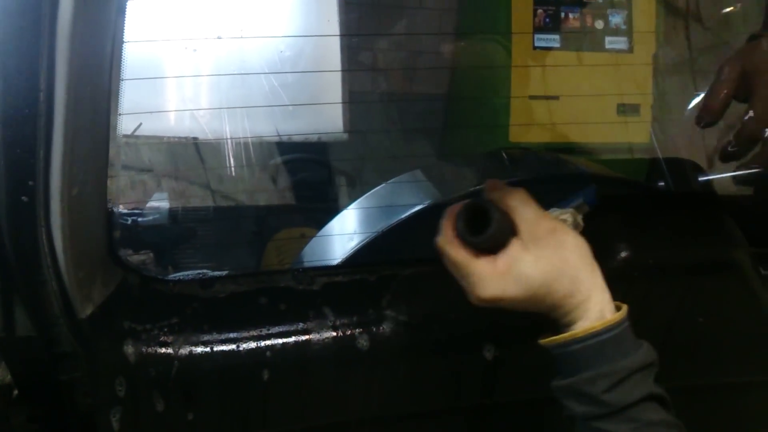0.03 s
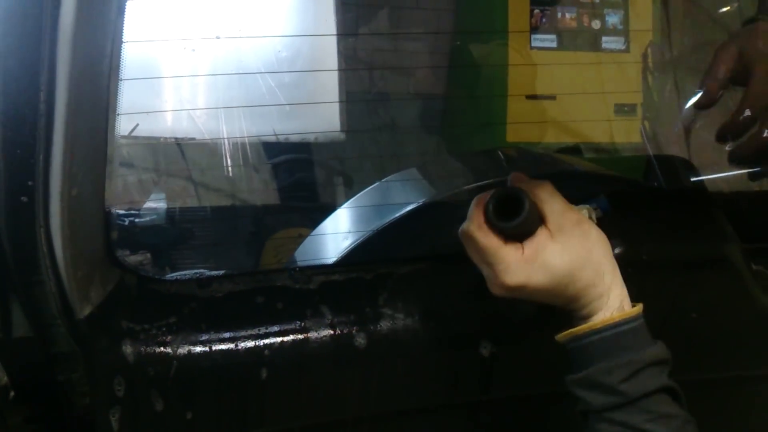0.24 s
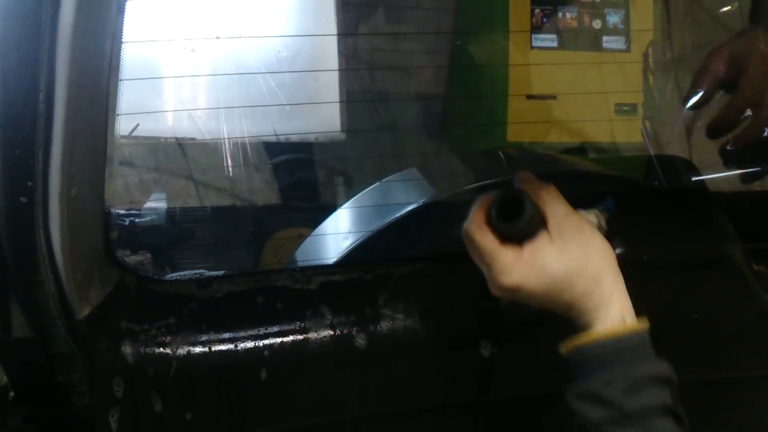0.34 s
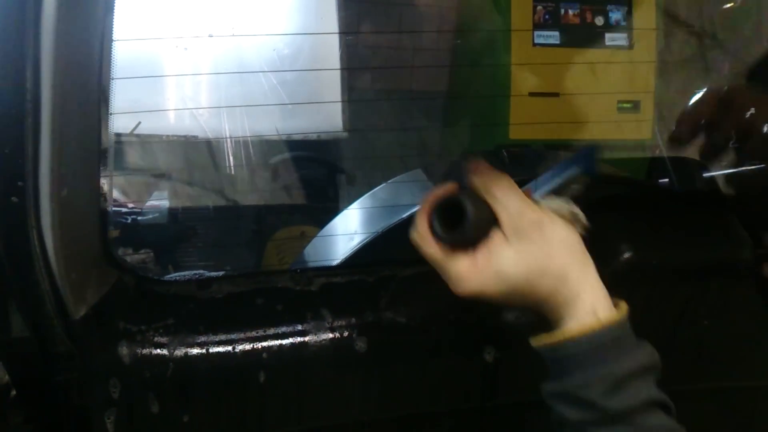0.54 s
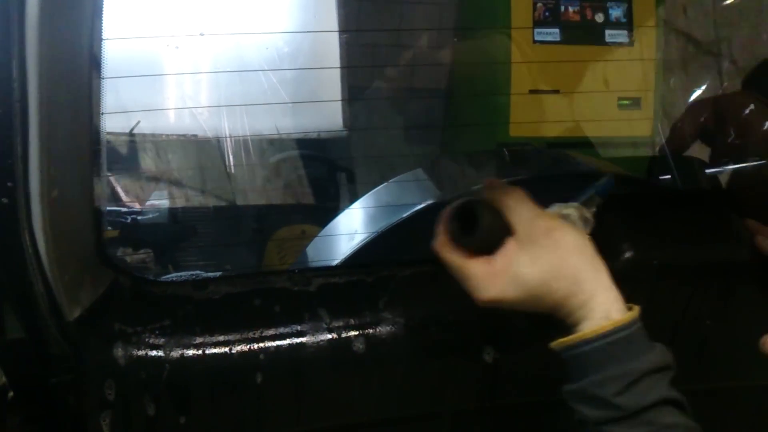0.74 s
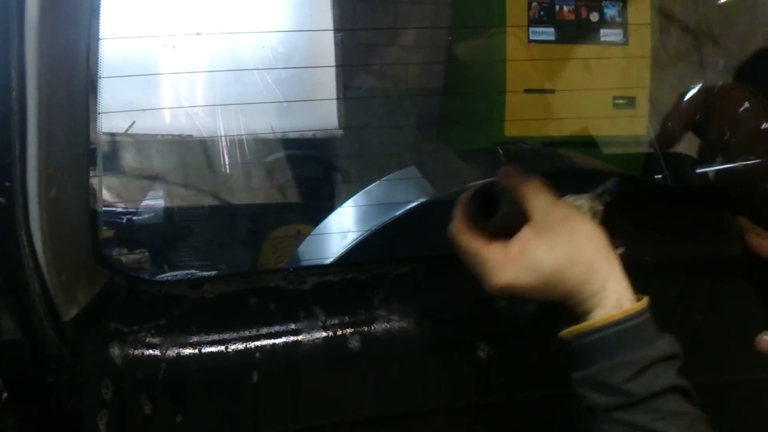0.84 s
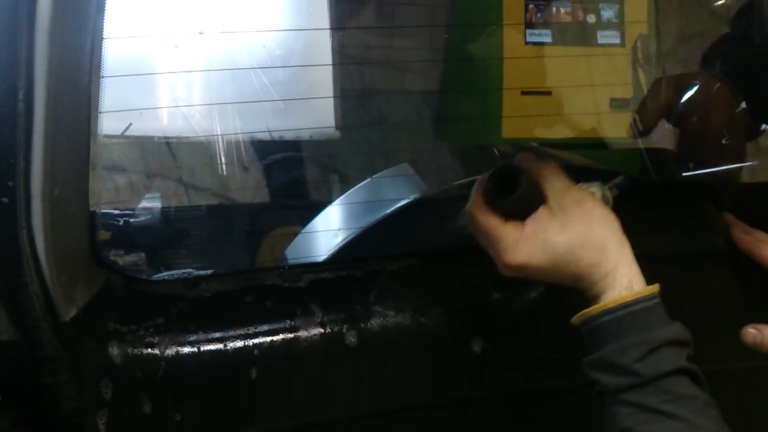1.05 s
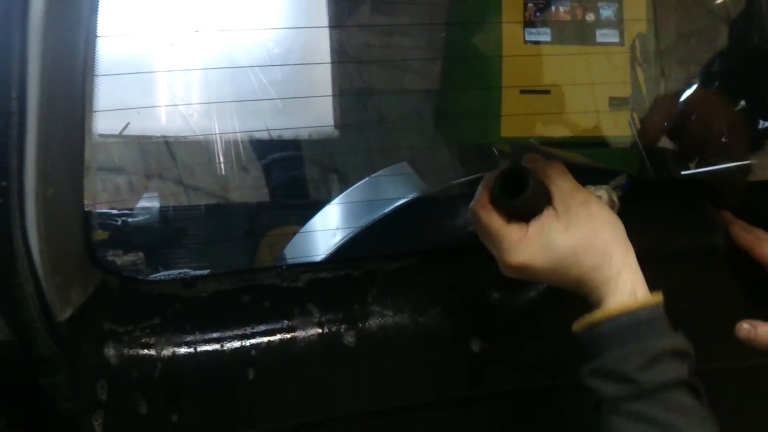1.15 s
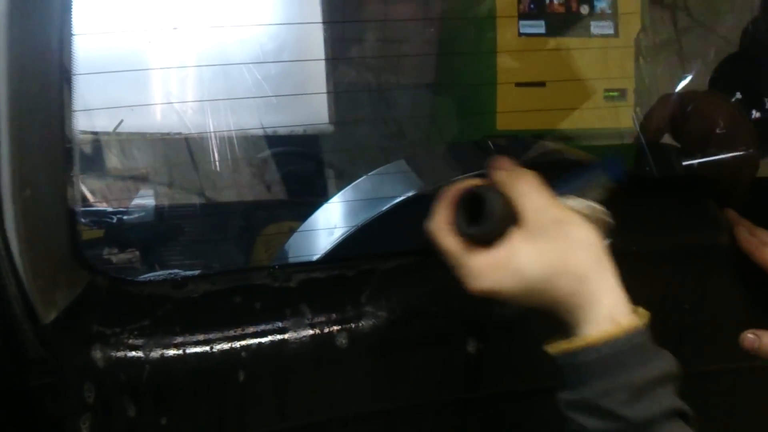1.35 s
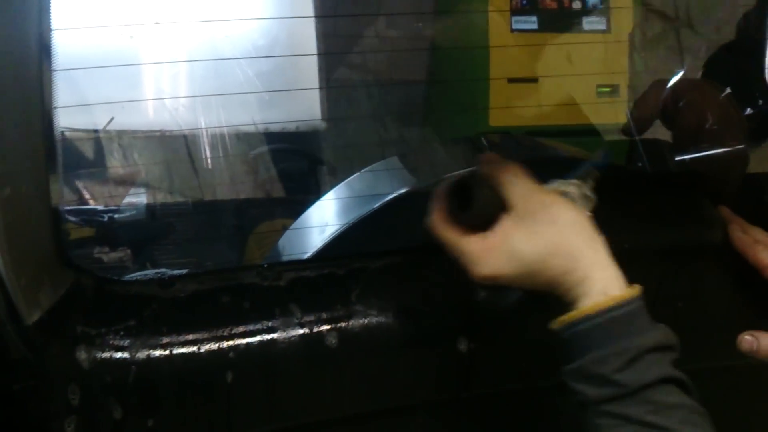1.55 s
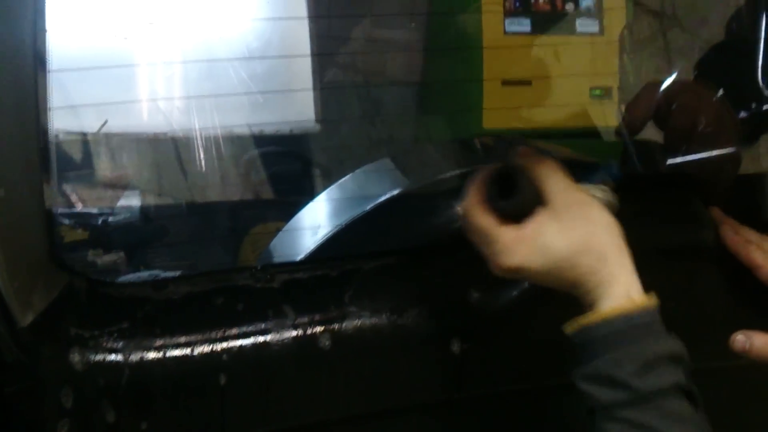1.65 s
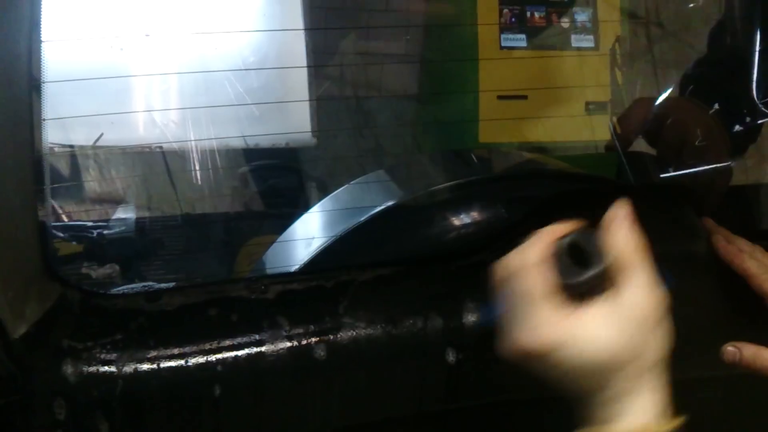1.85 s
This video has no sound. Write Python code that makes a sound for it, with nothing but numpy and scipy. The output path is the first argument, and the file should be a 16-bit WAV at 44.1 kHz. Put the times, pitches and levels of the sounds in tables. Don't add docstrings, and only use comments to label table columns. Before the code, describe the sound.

A hard tool edge scrapes film on a car's rear window, very close. Soft knocks come first, then a sharp crack and low buzzing shudder at 0.4 s and a clear knock at 0.65. A low jolt near 0.97 leads to a second shudder around 1.14, crowded ticks and a tiny squeal at 1.2. Sparser knocks follow from 1.58 to 1.8, over faint rubbing, handling rumble and quiet workshop hum.

```python
import sys
import numpy as np
from scipy import signal
from scipy.fft import rfft, irfft
from scipy.io import wavfile
from scipy.ndimage import uniform_filter1d

SR = 44100
rng = np.random.default_rng(int(sys.argv[2]) if len(sys.argv) > 2 else 0)


def to_wav(s):
    ch = np.atleast_2d(s).T
    pcm = np.round(np.clip(ch, -1, 1) * 32767)
    wavfile.write(sys.argv[1], SR, pcm.astype(np.int16))


def gain_from_db(level_db):
    decades = np.asarray(level_db, float) / 20
    return 10 ** decades


N = 83790

# hz, level_db
SHOP_SPECTRUM = [(20, 5), (330, -22.5), (910, -6.5), (1500, -15.5), (6000, -26), (7900, -21), (9500, -30.5),
                 (15000, -43.5)]
# hz, level_db
RUMBLE_SPECTRUM = [(15, -1), (30, -2), (65, -4.5), (100, -15), (145, -8), (200, -10), (400, -17),
                   (700, -49.5)]
# time_s, level_db
HAND_MOTION = [(0.0, -67.5), (0.328, -65.5), (0.418, -65.5), (1.184, -60.5), (1.312, -69), (1.56, -90.5),
               (1.73, -62), (1.9, -66.5)]
# start_s, level_db, pitch_hz
MOUNT_JOLTS = [
    (0.966, -44.5, 70),
    (1.283, -59, 53),
    (1.596, -46.5, 68),
]
# start_s, length_s, grit_db, scratch_db, hiss_db
STROKES = [(-.06, 0.083, -73, -72, -68.5), (0.003, 0.16, -74, -72.5, -59.5),
           (0.394, 0.016, -47, -51, -61.5), (0.402, 0.11, -68.5, -72.5, -74), (0.455, 0.037, -71, -89, -75),
           (0.605, 0.21, -72, -78.5, -76), (0.811, 0.013, -71, -66, -89), (0.836, 0.21, -75.5, -75, -76.5),
           (1.042, 0.091, -64, -59, -65.5), (1.081, 0.097, -70, -85, -62.5),
           (1.167, 0.064, -58, -58.5, -66.5), (1.232, 0.06, -60.5, -66, -69),
           (1.624, 0.025, -63.5, -61.5, -75.5), (1.653, 0.16, -77.5, -69, -76.5),
           (1.772, 0.0067, -50.5, -59.5, -64.5), (1.794, 0.085, -61, -66, -72)]
# hz, level_db
HISS_SPECTRUM = [(1500, -27.5), (5100, -13.5), (6800, -10), (7900, -2), (9300, -14.5), (13500, -30),
                 (15500, -32)]
# hz, level_db
GRIT_SPECTRUM = [(90, -47), (160, 3), (300, 0.5), (520, -2.5), (830, -5), (1030, -5.5), (1350, -19),
                 (2600, -37)]
# hz, level_db
SCRATCH_SPECTRUM = [(900, -49), (1400, -4.5), (2120, -5.5), (2600, -8), (3300, -8), (4400, -19),
                    (6500, -24.5), (9000, -50)]
# start_s, level_db, pitch_hz, t60_s
TICKS = [(0.244, -50, 745, 0.036), (0.4005, -41, 836, 0.043), (0.405, -43.5, 2070, 0.023),
         (0.412, -43.5, 806, 0.037), (0.4122, -36.5, 261, 0.046), (0.433, -49.5, 894, 0.074),
         (0.416, -46, 1684, 0.035), (0.6538, -39, 996, 0.035), (0.656, -42, 646, 0.035),
         (0.655, -48, 2150, 0.024), (0.669, -62, 1060, 0.045), (1.048, -63.5, 830, 0.024),
         (1.112, -50, 993, 0.038), (1.122, -53, 880, .03), (1.152, -48, 856, 0.031),
         (1.191, -47.5, 946, 0.027), (1.2055, -39.5, 845, 0.022), (1.215, -51, 702, 0.048),
         (1.224, -47.5, 615, 0.035), (1.228, -52, 1030, 0.018), (1.243, -51, 800, 0.049),
         (1.2705, -43.5, 830, 0.023), (1.278, -55.5, 890, .02), (1.287, -49, 840, 0.057),
         (1.296, -52, 804, 0.035), (1.5765, -50, 806, 0.033), (1.597, -45.5, 490, 0.019),
         (1.639, -59, 2900, 0.019), (1.711, -64, 840, 0.026), (1.772, -41.5, 1254, 0.023),
         (1.777, -44, 334, 0.046), (1.806, -55, 416, 0.02), (1.869, -56.5, 2190, 0.039),
         (0.09, -55.5, 139, 0.19), (0.46, -52, 298, .08), (0.495, -51.5, 281, 0.13),
         (0.5, -58.5, 457, 0.14), (1.195, -56.5, 3480, 0.082), (1.21, -61, 3700, 0.042),
         (1.338, -58, 140, 0.095), (1.5265, -65.5, 700, 0.018), (1.693, -51, 336, 0.017)]
# start_s, length_s, pitch_hz, level_db
SQUEAL = (1.2, 0.05, 2109.5, -59)
# time_s, rate_hz, level_db
SHUDDERS = [
    [(0.38, 240.7, -54), (0.389, 240.6, -43.5), (0.401, 238.4, -29), (0.407, 235, -33.5), (0.412, 219, -47),
     (0.431, 198.4, -71), (0.441, 216, -41.5), (0.455, 205, -51.5), (0.475, 219, -70)],
    [(1.068, 214, -56), (1.09, 224, -49.5), (1.104, 230.5, -38), (1.123, 218, -47), (1.136, 193.5, -29),
     (1.15, 209, -38.5), (1.166, 222, -41), (1.178, 237, -49.5), (1.19, 236, -69)],
]
# start_s, crack_db, spot_hz,
# thump_re_crack_db, left_re_right_db
KNOCKS = [(0.004, -56.5, 126, 4.5, -4.5), (0.085, -66.5, 136, -0.5, -15),
          (0.244, -46, 160.7, 7, -2.5), (0.269, -51, 223.5, 1.5, -4.5), (0.399, -35, 243, -17, -9.5),
          (0.402, -49.5, 277, -14, -9), (0.4069, -40, 188.6, 8.5, -4), (0.44, -58, 210, 10, 2),
          (0.612, -50, 147, 1, -2.5), (0.654, -36, 153.5, -1, -2), (0.687, -55.5, 130.5, 7.5, -4),
          (0.818, -58, 145, 9.5, -4), (0.908, -54.5, 316, -15.5, -11),
          (0.96, -51.5, 163.7, 14.5, 6.5),
          (0.975, -67, 134, 21, 3), (1.129, -63.5, 182, 8.5, -9), (1.151, -46, 203, -33, -3),
               (1.191, -46.5, 188, 1, -1), (1.205, -43, 156.3, -0.5, -3), (1.272, -49, 311, -14, -11),
               (1.527, -61.5, 148.5, 6.5, -3.5), (1.576, -48.5, 162, 3, -2), (1.595, -59.5, 144, 5.5, 22.5),
               (1.63, -45, 155, 5, -4), (1.665, -59, 136, 11, 0), (1.693, -71, 177, 15.5, 27.5),
               (1.729, -57, 162, -1, -6), (1.771, -42, 313, -12.5, -9), (1.805, -54, 333, -2, -5)]
# hz, level_db, t60_s
PANE_MODES = [(143, -12, .1), (215, -18, .07), (275, -16, .07), (360, -20, .06), (460, -26, .11)]
# hz, level_db, t60_s
EDGE_MODES = [(660, -5, .035), (835, -1, .05), (1000, 0, .05), (1200, -3, .025), (1450, -4, .02),
              (1700, -4, .025), (2110, -7, .03), (2800, -17, .02), (3400, -19, .02)]
# hz, gain_db
LEFT_PORT_GAIN = [(100, -6), (500, 1.5), (1000, 5.5), (2000, -25.5), (4000, -37), (8000, -77), (12000, 0),
                  (15000, 11)]

SHOP_DB = -70.5
GRIT_PER_S, GRIT_SPREAD_DB = 2200, 2
RISE_SHARE, RELEASE_SHARE = 0.6, 0.2
TICK_BITE_S, TICK_PAN_DB, TICK_PARTNER_RATIO, TICK_PARTNER_DB = 0.0003, -3.5, 1.404, -8.5
SHUDDER_JITTER, SHUDDER_PAN_DB, SHUDDER_OCTAVE_DB = 0.0514, -4.5, -57
SPOT_T60_S, PARTNER_RATIO, PARTNER_DB, PARTNER_T60_S = 0.089, 1.703, -5, 0.052
SWELL_S, BITE_S, SPILL_HZ = 0.0022, 0.0007, 120.3
THUMP_DB, CRACK_DB = 7.5, -10.5
SNAP_DB, SNAP_T60_S, RATTLE_DB, RATTLE_T60_S = 7, 0.022, -10, 0.15
TOP_HZ, LOUD_DB, DULL_SHARE = 3050, -35.5, 0.13
HIT_SCATTER_DB = 2
ROOM_DB, ROOM_T60_S, LEFT_LAG_SAMPLES = -19, 0.25, 8


def curve(rows, col=1):
    r = np.array(rows)
    return np.interp(np.arange(N) / SR, r[:, 0], r[:, col])


def colour(x, points):
    p = np.array(points)
    hz = np.arange(N // 2 + 1) * SR / N + 1
    gain_db = np.interp(np.log(hz), np.log(p[:, 0]), p[:, 1])
    return irfft(rfft(x) * gain_from_db(gain_db), N)


def unit(x):
    return x / np.sqrt(np.mean(x ** 2))


def walk(rate_hz):
    hold = int(SR / rate_hz)
    steps = np.repeat(rng.standard_normal(N // hold + 1), hold)
    return 1.45 * uniform_filter1d(uniform_filter1d(steps, hold), hold)[:N]


def fade(t, t60_s):
    return np.exp(-np.log(1000) * t / t60_s)


def onset(t, rise_s):
    return 1 - np.exp(-t / rise_s)


def ring(t, modes, scatter):
    out = 0
    for (hz, db, t60_s), s in zip(modes, scatter):
        tone = np.sin(2 * np.pi * hz * (1 + 0.018 * s) * t)
        out = out + gain_from_db(db + HIT_SCATTER_DB * s) * tone * fade(t, t60_s)
    return out


def bandpass(x, lo_hz, hi_hz, order=2):
    return signal.sosfilt(signal.butter(order, [lo_hz, hi_hz], "band", fs=SR, output="sos"), x)


def pan(db):
    return gain_from_db(np.array([[db / 2], [-db / 2]]))


def workshop():
    mid, side = (unit(colour(rng.standard_normal(N), SHOP_SPECTRUM)) for _ in range(2))
    side = colour(side, [(30, -0.5), (300, 1.5), (1500, -1.0), (15000, 3.5)])
    left = colour(mid + side, [(30, 5), (1000, -1.5), (4000, -1.5), (8000, -11), (11000, 0.0)])
    return gain_from_db(SHOP_DB - 2.0) * np.array([left, mid - side])


def handling():
    mid, side = (unit(colour(rng.standard_normal(N), RUMBLE_SPECTRUM)) * gain_from_db(1.1 * walk(3.3))
                 for _ in range(2))
    rumble = gain_from_db(curve(HAND_MOTION) + 3.0) * (mid + 0.33 * side * np.array([[1], [-1]]))
    jolts = 0
    for start_s, db, hz in MOUNT_JOLTS:
        after = np.clip(np.arange(N) / SR - start_s, 0, None)
        jolts = jolts + ring(after, [(hz, db, 0.12)], [0]) * onset(after, 0.0014)
    return rumble * pan(-4.5) + jolts * pan(7.8)


def pressure(col):
    t, power = np.arange(N) / SR, 1e-12
    for row in STROKES:
        u = (t - row[0]) / row[1]
        rise = np.sin(np.pi / 2 * np.clip(u / RISE_SHARE, 0, 1)) ** 2
        release = np.exp(-np.clip(u - 1, 0, None) / RELEASE_SHARE)
        power = power + (rise * release * gain_from_db(row[col])) ** 2
    return np.sqrt(power)


def slide():
    noise = np.array([unit(colour(rng.standard_normal(N), HISS_SPECTRUM)) for _ in range(2)])
    port_gain = gain_from_db(np.array([[-7], [0]]))
    return noise * port_gain * pressure(col=4) * gain_from_db(1.5 * walk(45.03))


def grains(points, ring_share, patchy_db):
    size = gain_from_db(GRIT_SPREAD_DB * np.minimum(rng.exponential(size=(2, N)), 3))
    clicks = (rng.random((2, N)) < GRIT_PER_S / SR) * rng.standard_normal((2, N)) * size
    clicks = np.array([clicks[0], clicks[0] + 0.64 * clicks[1]])
    rung = 0
    for hz, _, t60_s in EDGE_MODES:
        r = fade(1 / SR, t60_s)
        poles = [1, -2 * r * np.cos(2 * np.pi * hz / SR), r * r]
        flare = gain_from_db(patchy_db * np.clip(walk(21.7), -2, 1.5))
        rung = rung + flare * unit(signal.lfilter([1, 0, -1], poles, clicks))
    return np.array([unit(colour(c, points)) + ring_share * unit(colour(g, points))
                     for c, g in zip(clicks, rung)])


def scrape():
    drumming = pressure(col=2) * gain_from_db(3.57 * walk(39.98)) * grains(GRIT_SPECTRUM, 0.21, 3.2)
    scratching = pressure(col=3) * grains(SCRATCH_SPECTRUM, 0.32, 11.0)
    return drumming * pan(-5) + scratching


def ticks():
    out = 0
    for start_s, db, hz, t60_s in TICKS:
        after = np.clip(np.arange(N) / SR - start_s, 0, None)
        partner = (hz * TICK_PARTNER_RATIO, db + TICK_PARTNER_DB, t60_s * 0.6)
        out = out + ring(after, [(hz, db, t60_s), partner], [0, 0]) * onset(after, TICK_BITE_S)
    return out * pan(TICK_PAN_DB)


def squeal():
    t = np.arange(N) / SR
    start_s, length_s, hz, db = SQUEAL
    swell = np.sin(np.pi * np.clip((t - start_s) / length_s, 0, 1))
    return gain_from_db(db) * swell * np.sin(2 * np.pi * hz * t) * pan(TICK_PAN_DB)


def shudder():
    t, out = np.arange(N) / SR, 0
    for rows in SHUDDERS:
        rate_hz = curve(rows) * (1 + SHUDDER_JITTER * walk(89.9))
        phase = 2 * np.pi * np.cumsum(rate_hz) / SR
        gate = uniform_filter1d(1.0 * (t > rows[0][0]) * (t < rows[-1][0]), size=400)
        wave = np.sin(phase) + gain_from_db(SHUDDER_OCTAVE_DB) * np.sin(2 * phase)
        out = out + gate * gain_from_db(curve(rows, col=2)) * np.sqrt(2) * wave
    return out * pan(SHUDDER_PAN_DB)


def knocks():
    out, t = np.zeros((2, N + SR)), np.arange(SR // 3) / SR
    for start_s, db, hz, thump_db, pan_db in KNOCKS:
        chance, noise = rng.standard_normal(24), rng.standard_normal((2, len(t)))
        spot = [(hz, 0, SPOT_T60_S), (hz * PARTNER_RATIO, PARTNER_DB, PARTNER_T60_S)]
        thump = ring(t, spot, [0, chance[0]]) + ring(t, PANE_MODES, chance[1:])
        thump = bandpass(thump * onset(t, SWELL_S), SPILL_HZ, 1200)
        snap = gain_from_db(SNAP_DB) * 3 * bandpass(noise[0], 280, 1930) * fade(t, SNAP_T60_S)
        rattle = gain_from_db(RATTLE_DB) * 3 * bandpass(noise[1], 210, 2100) * fade(t, RATTLE_T60_S)
        crack = (ring(t, EDGE_MODES, chance[10:]) + snap + rattle) * onset(t, BITE_S)
        top_hz = np.clip(TOP_HZ * gain_from_db(DULL_SHARE * (db - LOUD_DB)), 1000, 6000)
        crack = bandpass(bandpass(crack, 100, 3500), 160, top_hz)
        blow = gain_from_db(thump_db + THUMP_DB) * thump + gain_from_db(CRACK_DB) * crack
        i = int(start_s * SR)
        out[:, i:i + len(t)] += gain_from_db(db) * pan(pan_db) * blow
    return out[:, :N]


def echo(work):
    t = np.arange(SR // 2) / SR
    tails = rng.standard_normal((2, len(t))) * fade(t, ROOM_T60_S) * np.clip(t / 0.018, 0, 1)
    tails = bandpass(tails, 350, 2500, order=1)
    tails = tails / np.sqrt((tails ** 2).sum(axis=1, keepdims=True))
    wet = signal.fftconvolve(work[1:], tails, axes=1)[:, :N]
    return gain_from_db(ROOM_DB) * wet * pan(-8.0)


def scene():
    work = slide() + scrape() + ticks() + squeal() + shudder() + knocks()
    left = np.roll(colour(work[0], LEFT_PORT_GAIN), LEFT_LAG_SAMPLES)
    return workshop() + handling() + echo(work) + np.array([left, work[1]])


def band_limit(x):
    return signal.sosfilt(signal.butter(12, 15370, fs=SR, output="sos"), x)


def record(dry):
    return band_limit(dry)


dry = scene()
out = record(dry)
to_wav(out)
```